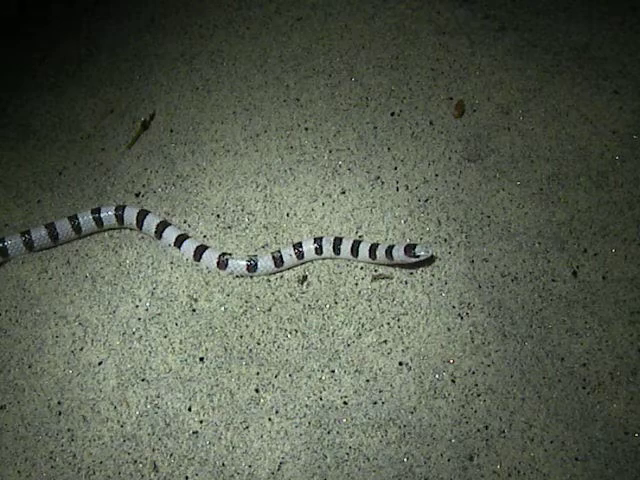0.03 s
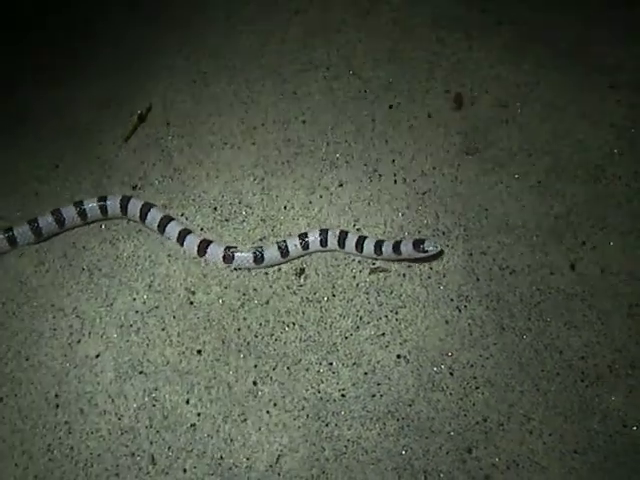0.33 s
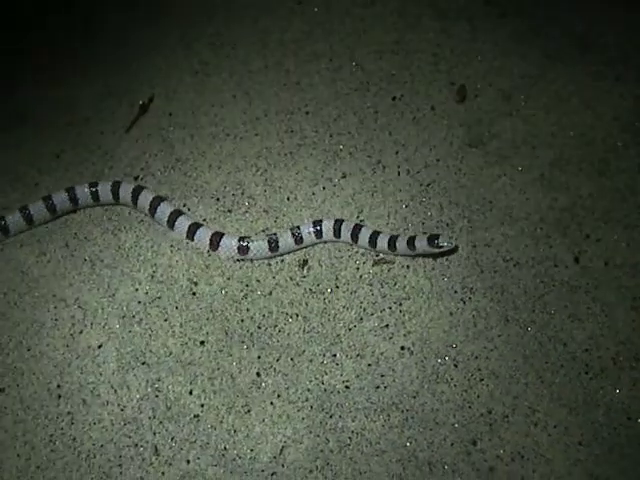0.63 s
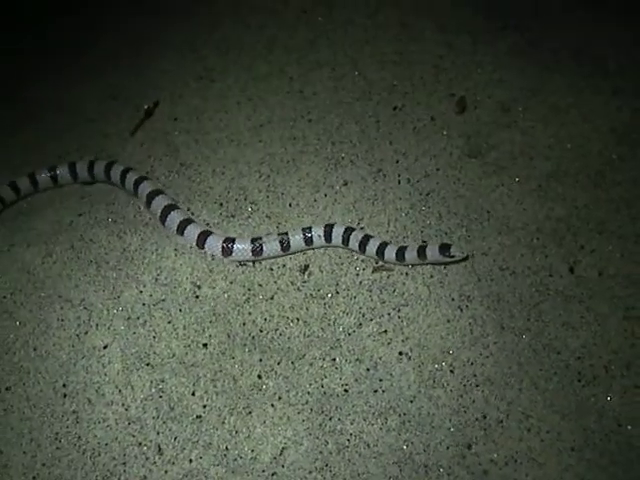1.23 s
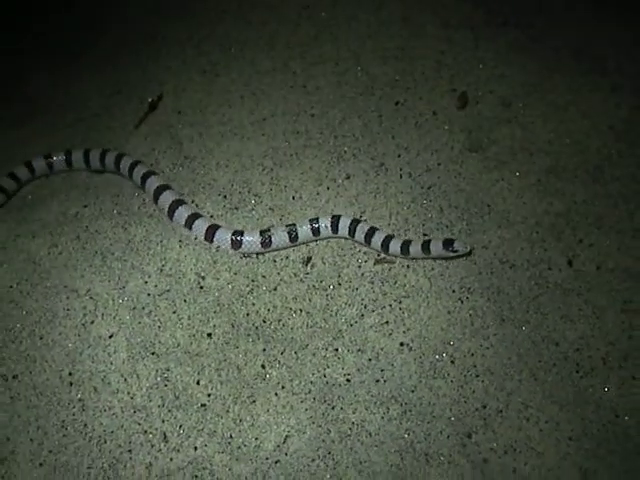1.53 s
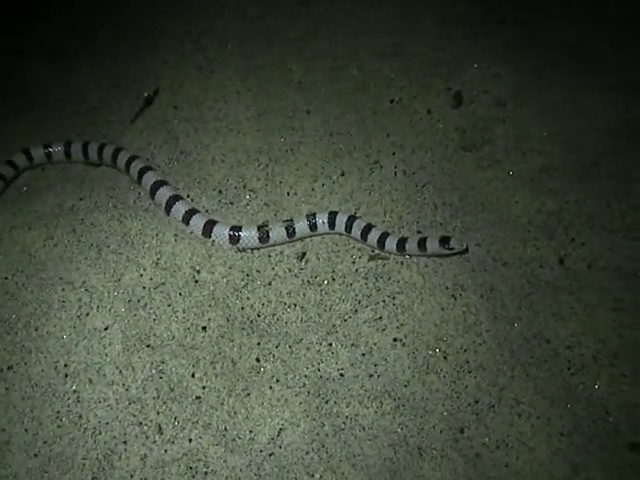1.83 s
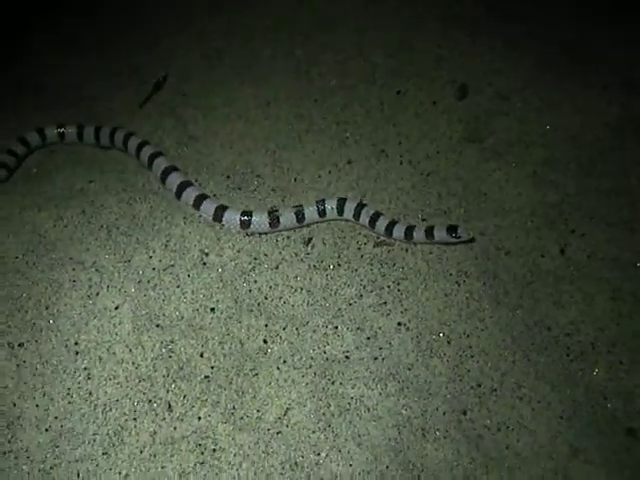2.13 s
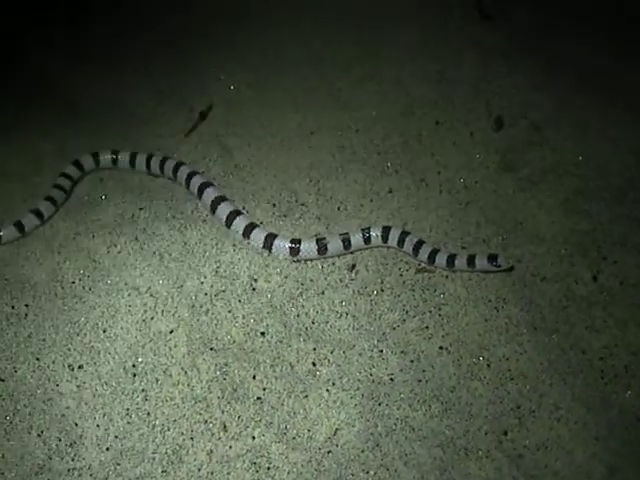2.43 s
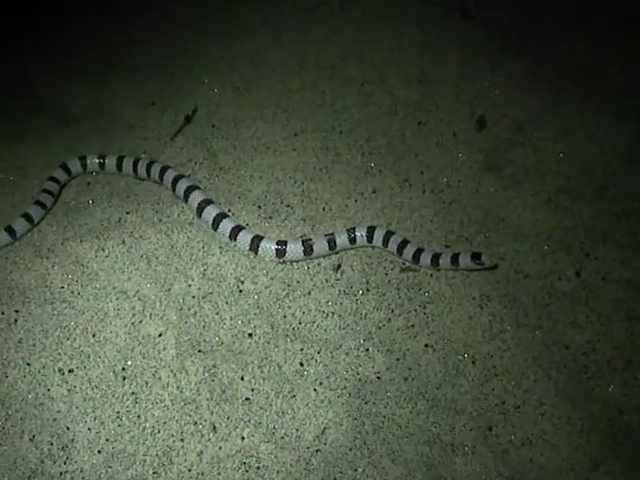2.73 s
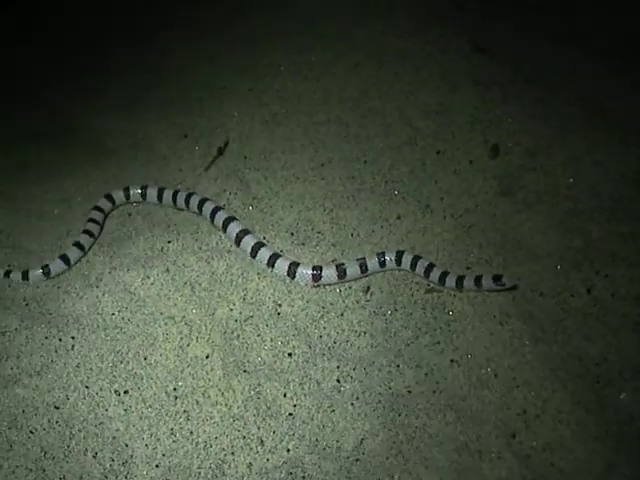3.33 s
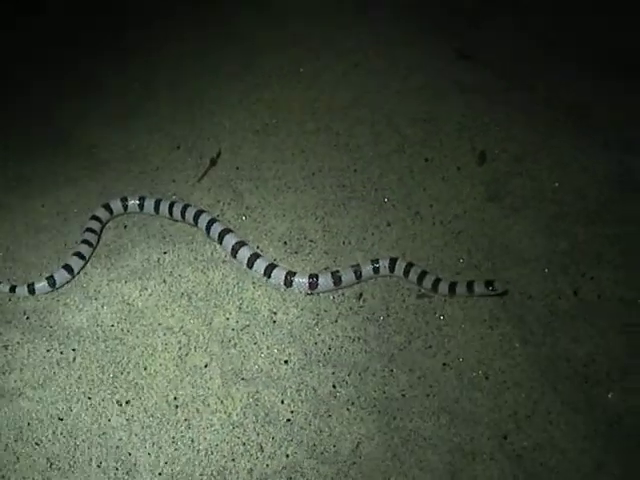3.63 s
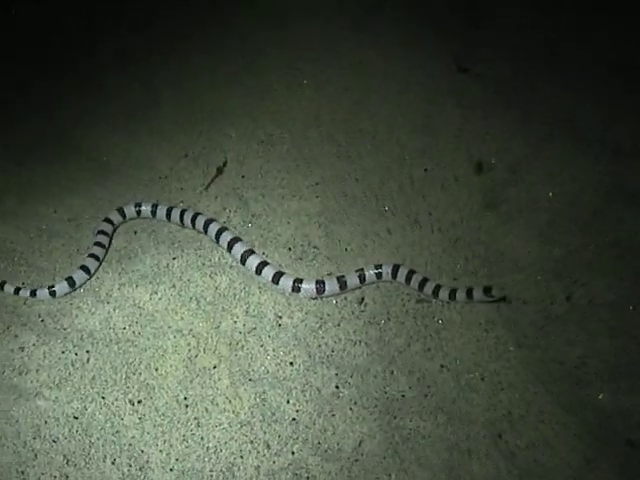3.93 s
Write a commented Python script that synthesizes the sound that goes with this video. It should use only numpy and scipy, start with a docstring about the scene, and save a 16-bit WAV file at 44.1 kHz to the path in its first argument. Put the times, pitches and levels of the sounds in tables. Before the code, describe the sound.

Low, grainy underwater hiss starts with a pop on a small camera's microphone. A couple of ringing ticks and a soft knock on the housing follow, then faint snaps and slight rustles, and a sharp tick near the end.

```python
"""On a sandy sea bed at night, heard through a small underwater camera. A banded sea snake glides by
without a sound. The camera's housing rings with a few sharp ticks and one soft knock. Behind them are
faint snaps in the water, two faint rustles and a steady low hiss of water and microphone.
The recorder starts with a pop, and its slow, coarse converter makes the hiss dull and grainy."""
import sys
import numpy as np
from scipy import signal
from scipy.fft import rfft, irfft
from scipy.io import wavfile
from scipy.ndimage import uniform_filter1d

SR = 44100
rng = np.random.default_rng(int(sys.argv[2]) if len(sys.argv) > 2 else 0)


def transcribe(u):
    """Save the signal u as a 16-bit wav file named by the first command-line argument.

    u: samples, shape (n,) or (channels, n), limited to [-1, 1]; the rate is SR.
    q: integer samples, one column per channel.
    """
    v = np.clip(np.atleast_2d(u).T, -1, 1)
    q = np.round(v * 32767).astype(np.int16)
    wavfile.write(sys.argv[1], SR, q)


N = 176400
T = np.arange(N) / SR
SHORT = T[:SR // 10]  # the first 0.1 s, enough for one tick, knock or snap

# Ticks of the housing
# (time [s], pitch [Hz], level [dB], rise time [s], upper tone [ratio], crack [ratio])
HOUSING_TICKS = [(0.2533, 2950, -20.5, .0014, .3, .3), (.8552, 2860, -25.5, 0.0013, 0.43, .02),
                 (3.877, 3066, -15.5, .0012, 0.088, .02), (3.9078, 3070, -29.5, 0.0012, .05, .02),
                 (3.9370, 3120, -35.5, .0013, .05, .02), (3.9761, 3110, -35, .0013, .05, .02)]
# Tones of the knocked housing (pitch [Hz], level within the knock [dB], time to fade by 60 dB [s])
KNOCK_TONES = [(440, -0.5, .038), (953, -3.5, 0.015), (1350, -6, .012)]
# Nearby snaps in the water (time [s], band centre [Hz], band width [Hz], level [dB])
NEAR_SNAPS = [(0.4815, 1820, 1200, -33.5), (0.4895, 1854, 700, -38), (0.4913, 3800, 1000, -38.5),
              (.8578, 3500, 1000, -34.5), (0.9189, 1303, 1400, -38), (1.275, 1960, 700, -42),
              (1.37, 1750, 800, -39.5), (1.5593, 2400, 3000, -36)]
# Swells of rustling (time of the peak [s], about half the length [s], level [dB])
RUSTLE_SWELLS = [(0.901, 0.11, -54.5), (2.62, .13, -58.5)]
# Tone colour of the rustles (frequency [Hz], relative level [dB])
RUSTLE_COLOUR = [(500, -16.5), (1500, -0.5), (3000, -1), (4000, -8)]
# Tone colour of the hiss (frequency [Hz], relative level [dB])
HISS_COLOUR = [(20, -21), (60, -11), (120, -4), (220, 0.5), (320, 0.38), (480, -0.4), (700, -3.5),
               (1000, -5.5), (1300, -8.5), (2200, -12.5), (3100, -14.5), (4000, -20.5)]
# Loudness of the hiss over time (time [s], level [dB])
HISS_LOUDNESS = [(.07, -47.5), (.5, -47.5), (.9, -46), (1.35, -47), (1.6, -46), (2.35, -47), (2.6, -45.6),
                 (2.85, -47), (3.3, -47.5), (4, -47.5)]


def ticks(upper_hz=3610, sharpness=2.9, tail_db=-15.5):
    """Each tick cracks, makes two tones of the housing swell briefly and leaves a faint tail."""
    out = np.zeros(N)
    for at, hz, db, rise, upper_share, crack_share in HOUSING_TICKS:
        swell = (SHORT / rise * np.exp(1 - SHORT / rise)) ** sharpness
        main_tone = np.sin(2 * np.pi * hz * SHORT)
        upper_tone = upper_share * np.sin(2 * np.pi * upper_hz * SHORT)
        ring = swell * (main_tone + upper_tone)
        tail = gain(tail_db) * burst(hz=3380, width_hz=1100, fade_s=.016)
        crack = crack_share * burst(hz=2290, width_hz=6000, fade_s=.016)
        add(out, at, gain(db) * (ring + tail + crack))
    return out


def knock(at_s=.7951, level_db=-28):
    """A soft bump makes the low tones of the housing ring."""
    out = np.zeros(N)
    for hz, db, fade_s in KNOCK_TONES:
        tone = np.sin(2 * np.pi * hz * SHORT)
        add(out, at_s, gain(level_db + db) * fade(fade_s) * tone)
    return out


def snaps(fade_s=.02, distant_per_s=14):
    """A few nearby snaps, perhaps shrimp, over a random crackle of distant ones."""
    out = np.zeros(N)
    for at, hz, width_hz, db in NEAR_SNAPS:
        add(out, at, gain(db) * burst(hz, width_hz, fade_s))
    for _ in range(int(distant_per_s * N / SR)):
        at = rng.uniform(0, N / SR)
        hz = 1822 * 2 ** rng.uniform(-.5, .5)  # up to half an octave either way
        db = rng.normal(-49.5, 2.5)
        add(out, at, gain(db) * burst(hz, width_hz=1200, fade_s=fade_s))
    return out


def rustles():
    """Brief swells of brighter hiss, perhaps from sand."""
    swells = sum(gain(db) * np.exp(-((T - at) / half_s) ** 2) for at, half_s, db in RUSTLE_SWELLS)
    return noise(RUSTLE_COLOUR) * swells


def hiss(waver_db=.36):
    """Steady noise of water and microphone, wavering a little."""
    level_db = np.interp(T, *np.array(HISS_LOUDNESS).T)
    return noise(HISS_COLOUR) * gain(level_db + waver_db * drift(changes_per_s=9))


def gain(db):
    """Turn decibels into a number to multiply a sound by."""
    return 10 ** (np.asarray(db) / 20)


def add(out, at, sound):
    """Mix a short sound in at a time given in seconds."""
    start = int(at * SR)
    out[start:start + len(sound)] += sound[:max(N - start, 0)]


def fade(fade_s):
    """A curve that dies away, falling by 60 dB in fade_s seconds."""
    return np.exp(-np.log(1000) * SHORT / fade_s)


def burst(hz, width_hz, fade_s):
    """A crack: one broad band of noise that dies quickly."""
    edges_hz = [max(hz - width_hz / 2, 100), hz + width_hz / 2]
    band = signal.butter(2, edges_hz, "band", fs=SR, output="sos")
    white = rng.standard_normal(2 * len(SHORT))
    sound = signal.sosfilt(band, white)[len(SHORT):]  # keep the part after the filter settles
    return sound / sound.std() * fade(fade_s)


def noise(colour):
    """Noise of typical size 1, shaped by a colour table and empty above its last frequency."""
    hz, db = np.array(colour).T
    freqs = np.maximum(np.fft.rfftfreq(N, 1 / SR), 1)
    shape = gain(np.interp(np.log(freqs), np.log(hz), db)) * (freqs < hz[-1])
    sound = irfft(rfft(rng.standard_normal(N)) * shape, N)
    return sound / sound.std()


def drift(changes_per_s):
    """A smooth random wander of typical size 1."""
    hold = int(SR / changes_per_s)
    steps = np.repeat(rng.standard_normal(N // hold + 1), hold)
    smooth = uniform_filter1d(steps, hold)[:N]
    return smooth / smooth.std()


def lowpass(sound, hz):
    """Cut the treble steeply above hz without delaying the sound."""
    return signal.sosfiltfilt(signal.butter(16, hz, fs=SR, output="sos"), sound)


def scene():
    """Everything that reaches the one microphone."""
    background = hiss() + rustles()
    return (ticks() + knock() + snaps() + background)[None]


def record(dry, converter_hz=8000, step=.0055, offset=-.149, start_s=.07256):
    """The converter samples slowly in coarse steps; its constant offset pops in as it starts."""
    slow = signal.resample_poly(dry, converter_hz, SR, axis=1)  # dulls the sound
    grainy = step * np.round(slow / step)
    full_rate = signal.resample_poly(grainy, SR, converter_hz, axis=1)[:, :N]
    sound = lowpass(full_rate, hz=4330)
    switched_on = (sound + offset) * (T >= start_s)  # the jump away from zero is the pop
    return lowpass(switched_on, hz=16000)


dry = scene()
out = record(dry)
transcribe(out)
```